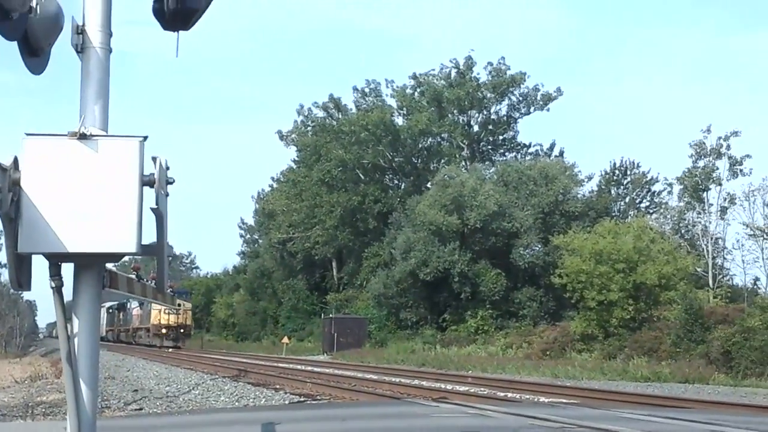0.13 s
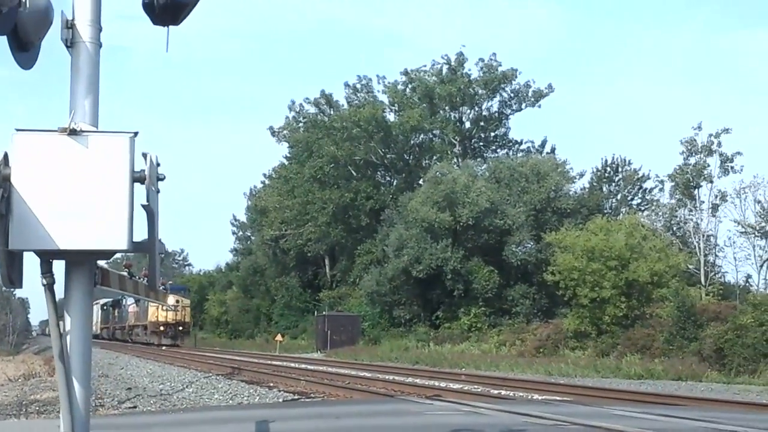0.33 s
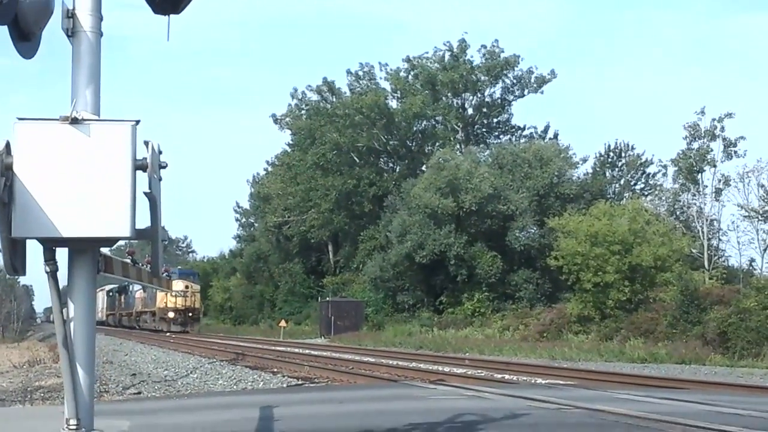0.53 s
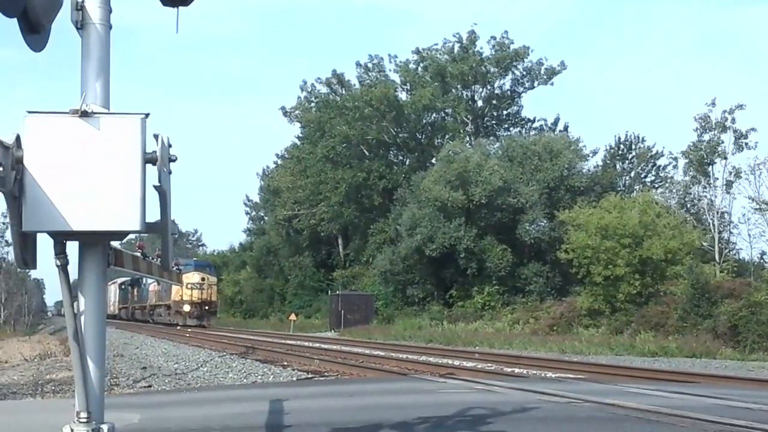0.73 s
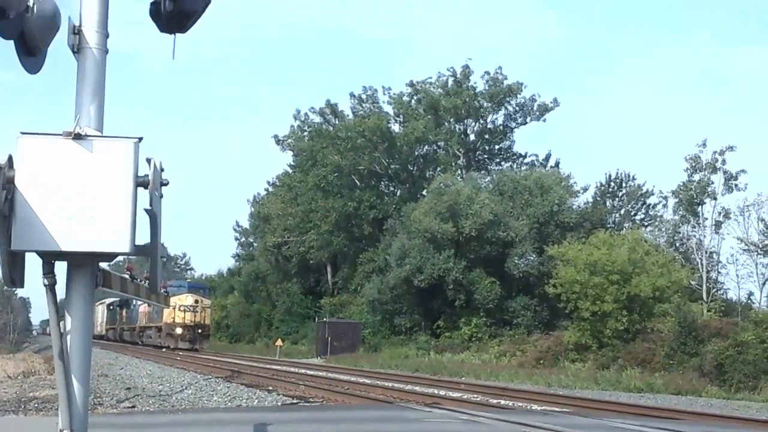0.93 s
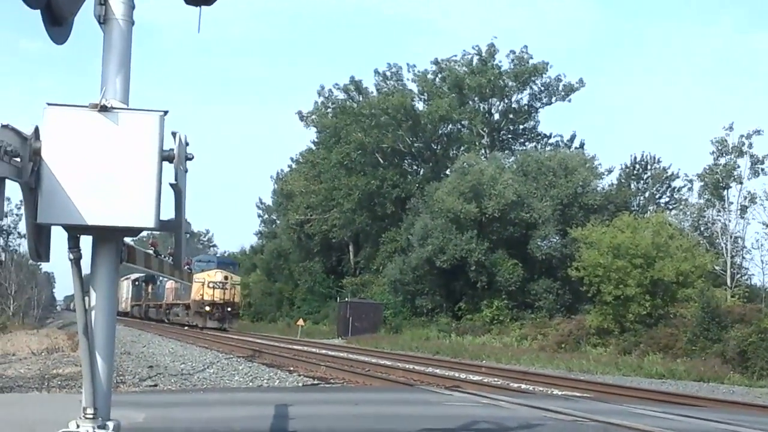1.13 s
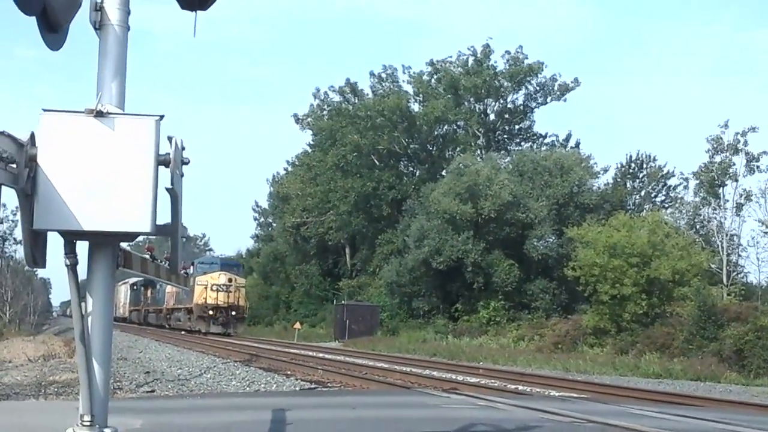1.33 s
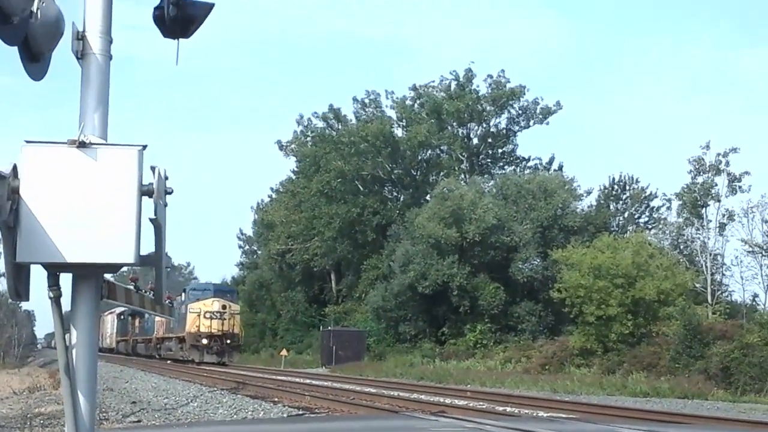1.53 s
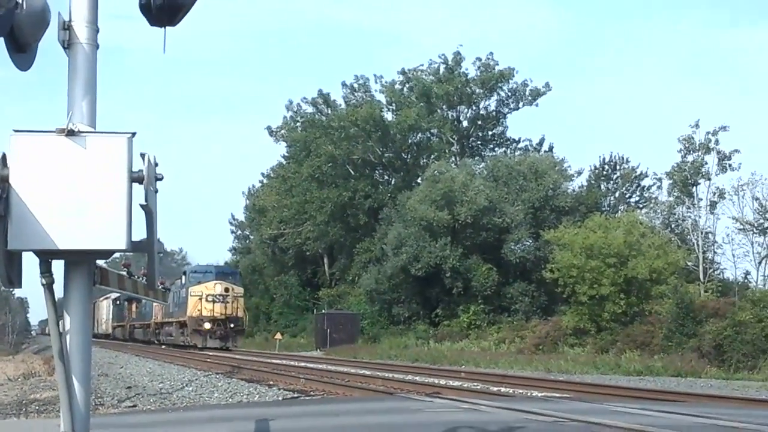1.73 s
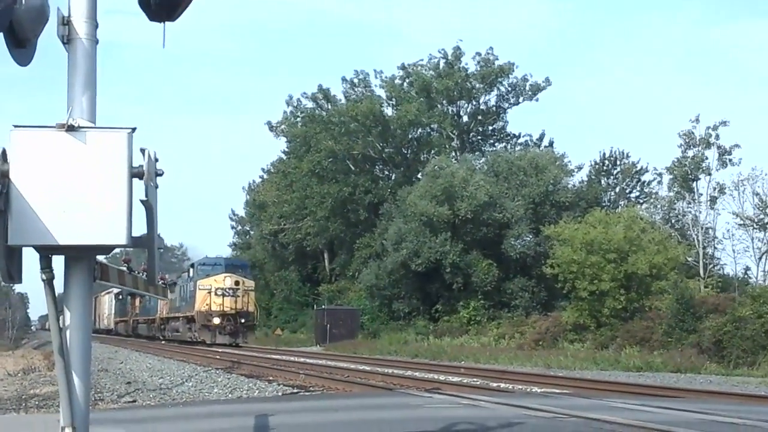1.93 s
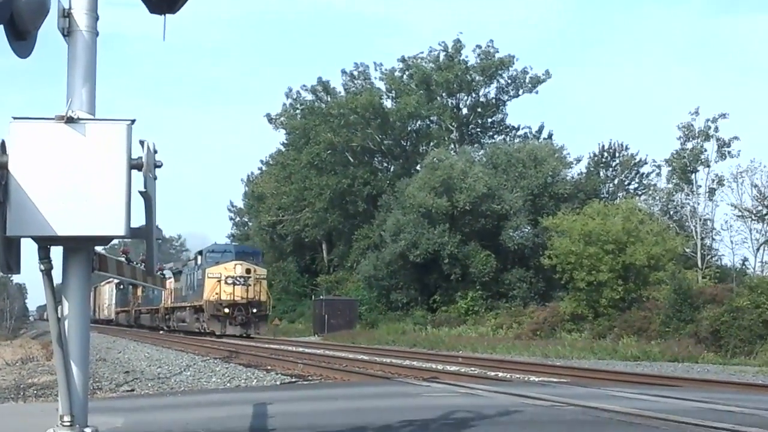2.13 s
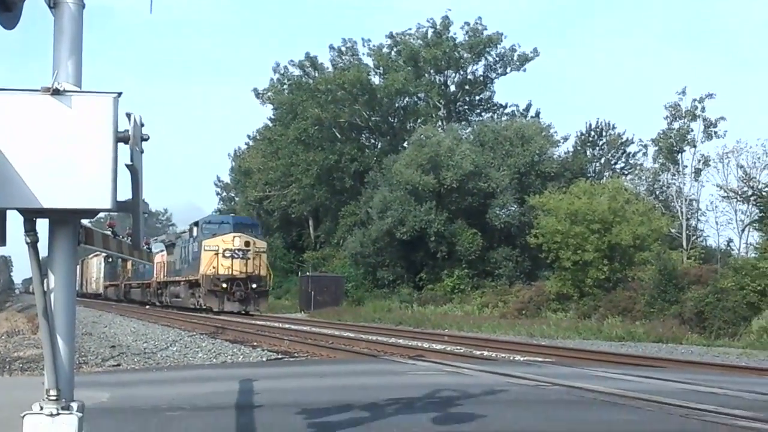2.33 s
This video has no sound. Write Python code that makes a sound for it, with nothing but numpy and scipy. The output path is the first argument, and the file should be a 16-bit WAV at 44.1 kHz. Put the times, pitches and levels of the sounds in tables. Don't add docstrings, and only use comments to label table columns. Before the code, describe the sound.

A freight train's air horn gives one long, harsh five-note blast, then sags and dies into echoes, over diesel throb and rail hiss; outdoors at a level crossing, loud enough to distort the microphone.

```python
import sys
import numpy as np
from scipy import signal
from scipy.fft import rfft, irfft, next_fast_len
from scipy.io import wavfile
from scipy.ndimage import uniform_filter1d, map_coordinates

SR = 44100
rng = np.random.default_rng(int(sys.argv[2]) if len(sys.argv) > 2 else 0)


def wav_record(signal):
    frames = np.transpose(np.atleast_2d(signal))
    bounded = np.clip(frames, -1, 1)
    quanta = np.round(bounded * 32767).astype(np.int16)
    wavfile.write(sys.argv[1], SR, quanta)


def attenuation_scalar(level_db):
    decades = np.asarray(level_db, float) / 20
    return 10 ** decades


N = 110250
STEP = 32

# pitch in Hz, level in dB.
DIESEL_TONES = [(47, -50), (78, -55.5), (96.5, -44), (120, -44.5)]
# pitch in Hz, level in dB.
OLD_RING = [(650, -63.5), (678, -47), (927, -41.5), (1942, -55.5)]
# frequency in Hz, level in dB per Hz.
HISS_COLOUR = [(100, -26), (200, -2.5), (450, -11.5), (900, -4), (1300, -19.5), (4500, -8.5), (6500, -18),
               (9500, -46.5)]
# frequency in Hz, level in dB per Hz.
RUMBLE_COLOUR = [(12, -55), (20, -19.5), (92, 0), (108, -8), (146, -8), (170, -11), (220, -44.5),
                 (370, -120)]
# frequency in Hz, likeness from -1 to 1.
ALIKE = [(60, -0.94), (200, -0.97), (510, -0.62), (800, -0.65), (1050, 0.65), (2160, 0.12), (9000, 0.14)]
# frequency in Hz, difference in dB.
TRAIN_PAN = [(60, 1.5), (160, 1.0), (450, 0.5), (1220, -2), (3320, -5), (9040, 6.5)]
# frequency in Hz, difference in dB.
HORN_PAN = [(140, 0.5), (320, 2), (650, 0.6), (1000, 0.9), (1700, -2), (3000, -6.5), (5200, -5), (9000, 6)]
# frequency in Hz, lead in radians.
LEFT_LEAD = [(330, 3.5), (445, 1.9444), (515, -1), (650, 3.5), (780, 3.5), (890, 1.65), (1030, -6.17),
             (1300, -2)]
# frequency in Hz, gain in dB.
ECHO_COLOUR = [(300, -8.5), (600, -2), (1000, -1.8), (1500, 10.5), (3000, 8), (6000, 13.5)]
# time in seconds, gain in dB.
ECHO_SWELL = [(.2, -1), (1.3, 0.66), (1.6, 3), (1.85, 1)]
# frequency in Hz, gain in dB.
FAR_AIR = [(700, 2), (1500, -2), (4000, -8)]
# frequency in Hz, width in Hz, gain in dB.
GROUND_DIPS = [(1161, 103, -7), (1705, 42, -4.5), (2342, 40, 1), (2703, 79, 1.5)]
# pitch in Hz, share of the pitch shift that the reed follows.
REEDS = [(331, 1), (386.2, .9), (445, 1), (513.5, .8), (650.6, .3)]
# level in dB, overtone slope in dB per octave,
# start in seconds, end in seconds, gain in dB as the valve closes.
CHIMES = [
    (-22, -3.5, .185, 1.9, 2.5),
    (-22, -4, .185, 1.98, -1),
    (-17.5, -4.5, 0.1806, 1.93, -4.5),
    (-29.5, -1, .2, 1.98, 6),
    (-15.5, -4.5, 0.23, 1.84, -2.5),
]
# time in seconds, level in dB, brightness in dB per octave.
PRESSURE = [
    (.17, -10.5, -18),
    (.23, 0.5, -9),
    (.33, -0.3, 1.5),
    (0.501, -0.7, 0.25),
    (1.379, -0.34, -1.1),
    (1.552, 1, -16.5),
    (1.759, 2, -40),
    (1.898, -5.5, -34),
    (2.021, -21, -16),
]
# time in seconds, shift in percent.
PITCH_SHIFT = [(.17, 1.6), (.23, 1.3), (.33, .6), (.5, .05), (1.4, .05), (1.56, -1.1), (1.8, -1.3),
               (2.02, -1.5)]
# frequency in Hz, gain in dB.
BELL = [(300, -3), (900, 4), (1160, 0), (1320, -8.5), (3200, -5.5), (5200, -4), (7000, -22.5),
        (10000, -36.5)]
# frequency in Hz, depth in dB.
SHIMMER = [(300, 2.5), (900, 3.5), (3000, 3)]
# frequency in Hz, level in dB per Hz.
BREATH_COLOUR = [(200, -34), (700, 1.5), (1500, -3.3), (5500, -8), (7500, -10), (10000, -41)]


def unit(x):
    return x / np.sqrt(np.mean(x ** 2) + 1e-20)


def along(points, hz):
    f, value = np.transpose(points)
    return np.interp(np.log(hz + 1), np.log(f + 1), value)


def wobble(rate, count):
    knots = rng.standard_normal((count, 80))
    at = np.arange(0, N, STEP) * rate / SR
    return map_coordinates(knots, np.broadcast_arrays(np.arange(count)[:, None], at), mode="mirror")


def full(x):
    return x.repeat(STEP, axis=-1)[..., :N]


def mixed(rows, gains):
    rows = np.pad(rows, [(0, 0), (0, -N % STEP)]).reshape(len(rows), -1, STEP)
    total = np.einsum("kbs,...kb->...bs", rows, gains.astype(rows.dtype))
    return total.reshape(*gains.shape[:-2], -1)[..., :N]


def filtered(x, response):
    m = next_fast_len(N + SR // 2)
    return irfft(rfft(x, m) * response(np.fft.rfftfreq(m, 1 / SR)), m)[..., :N]


def halves(points, hz):
    return np.outer([.5, -.5], along(points, hz))


def spread(pair, pan):
    def mid_and_side(hz):
        turn = np.arccos(np.clip(along(ALIKE, hz), -1, 1)) / 2
        return np.array([np.cos(turn), np.sin(turn)])

    mid, side = filtered(pair, mid_and_side)
    return filtered(np.array([mid + side, mid - side]), lambda hz: attenuation_scalar(halves(pan, hz)))


def rush(colour, patchy_db):
    z = signal.stft(rng.standard_normal((2, N)), nperseg=512)[2]
    patches = uniform_filter1d(rng.standard_normal(z.shape[1:]), size=6, axis=0)
    patches = uniform_filter1d(patches, size=12, axis=1)
    pair = signal.istft(z * attenuation_scalar(patchy_db * unit(patches)), nperseg=512)[1][:, :N]
    return unit(filtered(pair, lambda hz: attenuation_scalar(along(colour, hz))))


def unsteady_tones(table, waver_db, rate):
    hz, db = np.tile(np.transpose(table), 2)[:, :, None]
    size = uniform_filter1d(full(wobble(rate, count=len(hz))), STEP)
    drift = uniform_filter1d(full(wobble(rate, count=len(hz))), STEP)
    tones = attenuation_scalar(db + waver_db * size) * np.sin(2 * np.pi * hz * np.arange(N) / SR + 0.9 * drift)
    return tones.reshape(2, -1, N).sum(axis=1)


def train():
    hiss_db = -30.5 + 0.34 * np.arange(N) / N + 0.66 * full(wobble(5, count=1))
    hiss = attenuation_scalar(hiss_db) * rush(HISS_COLOUR, patchy_db=0.46)
    rumble = attenuation_scalar(-38) * rush(RUMBLE_COLOUR, patchy_db=-3.5)
    throb = unsteady_tones(DIESEL_TONES, waver_db=3, rate=9)
    fade = attenuation_scalar(-6 * np.arange(N) / SR)
    ring = fade * unsteady_tones(OLD_RING, waver_db=0.5, rate=14)
    return spread(hiss + rumble + throb + ring, TRAIN_PAN)


def echoes(x, count):
    near_s, far_s, half_power_s = .015, 1.6, .035
    deepest_drop = .085
    sideways = 1.7
    dull_from_s = .25
    t, start = np.arange(N) / SR, PRESSURE[0][0]
    where, far, size = rng.random((2 * count, 3)).T
    delay = near_s + far_s * far ** 2.5
    pitch = 1 - deepest_drop * np.sin(np.pi / 2 * where ** sideways) ** 2
    gain = attenuation_scalar(-1 + 5.16 * size) / np.sqrt(count * (1 + delay / half_power_s))
    flutter = gain[:, None] * attenuation_scalar(4.28 * wobble(14, count=2 * count))
    dull = filtered(x, lambda hz: attenuation_scalar(along(FAR_AIR, hz)))
    paths = []
    for ratio, late in zip(pitch, delay):
        source = dull if late > dull_from_s else x
        heard_at = start + (t - start - late) * ratio
        paths.append(np.interp(heard_at, t, source))
    paths = np.array(paths, dtype="float32")
    pair = np.array([mixed(paths[i::2], flutter[i::2]) for i in (0, 1)])
    return filtered(pair, lambda hz: attenuation_scalar(along(ECHO_COLOUR, hz)))


def horn():
    attack_s, release_s = .024, .05
    pitch_waver = .0006
    knee_hz = 2310
    t = np.arange(0, N, STEP) / SR
    at_s, level_points, bright_points = np.transpose(PRESSURE)
    level_db = np.interp(t, at_s, level_points)
    bright_db = np.interp(t, at_s, bright_points)
    shift = np.interp(t, *np.transpose(PITCH_SHIFT))
    closing = np.interp(t, (1.3, 1.6), [0, 1])
    sound = np.zeros((3, N))
    for (hz, follows), (db, slope_db, on, off, late_db) in zip(REEDS, CHIMES):
        k = np.arange(1, int(9500 / hz) + 1)[:, None]
        pitch = hz * (1 + follows * shift / 100 + pitch_waver * wobble(20, count=1)[0])
        cycles = np.cumsum(full(pitch)) / SR
        phase = k * (cycles % 1) + rng.random((len(k), 1))
        tones = np.sin(2 * np.pi * phase.astype("float32"))

        gate = np.clip((t - on) / attack_s, 0, 1) ** 2 * np.clip((off - t) / release_s, 0, 1)
        dulling = np.log2(1 + (k * hz / knee_hz) ** 4) / 4
        reed_db = db + level_db + late_db * closing
        overtone_db = slope_db * np.log2(k) + along(BELL, k * hz) + bright_db * dulling
        size = gate * attenuation_scalar(reed_db + overtone_db)

        flicker = wobble(18, count=3 * len(k)).reshape(3, len(k), -1)
        both, left, right = flicker * along(SHIMMER, k * hz)
        stir_db = [0 * both, 0.73 * both + 0.71 * left, 0.62 * both + 0.89 * right]
        sound += mixed(tones, size * attenuation_scalar(stir_db))
    air_gain = gate * attenuation_scalar(-27 + level_db + .9 * bright_db)
    air = full(air_gain) * rush(BREATH_COLOUR, patchy_db=2.5)
    return sound[0], sound[1:], air


def ground(hz):
    return attenuation_scalar(sum(db * np.exp(-((hz - at_hz) / width) ** 2) for at_hz, width, db in GROUND_DIPS))


def scene():
    steady, stirred, air = horn()
    direct = filtered(stirred, lambda hz: attenuation_scalar(halves(HORN_PAN, hz)) * np.exp(1j * halves(LEFT_LEAD, hz)))
    swell = attenuation_scalar(np.interp(np.arange(N) / SR, *np.transpose(ECHO_SWELL)))
    around = spread(echoes(swell * steady, count=40) + air, HORN_PAN)
    return filtered(direct + around, ground) + train()


def roll_off(x):
    return signal.sosfilt(signal.butter(12, 9640, fs=SR, output="sos"), x)


def record(dry):
    clipped = np.clip(dry, -1, 1)
    return roll_off(clipped)


dry = scene()
out = record(dry)
wav_record(out)
```